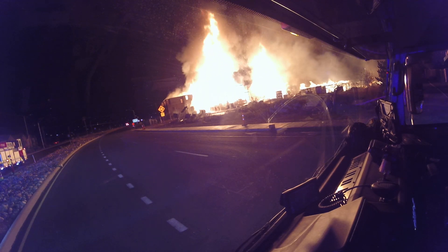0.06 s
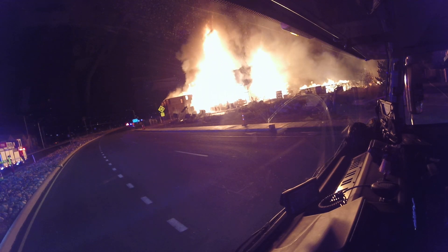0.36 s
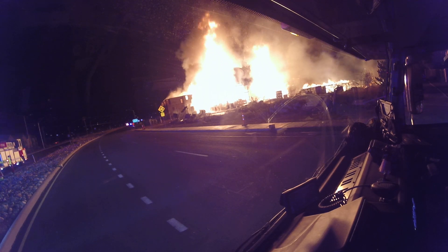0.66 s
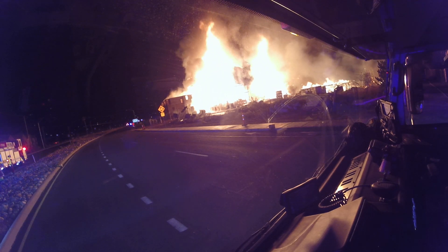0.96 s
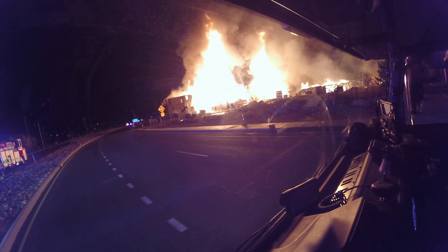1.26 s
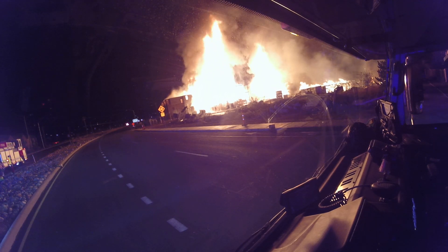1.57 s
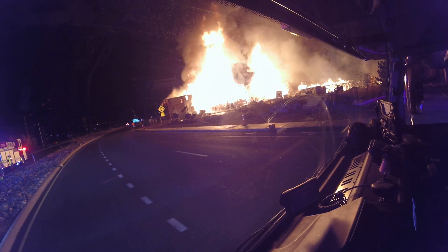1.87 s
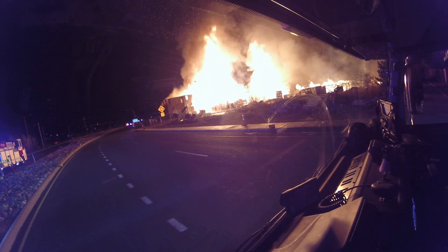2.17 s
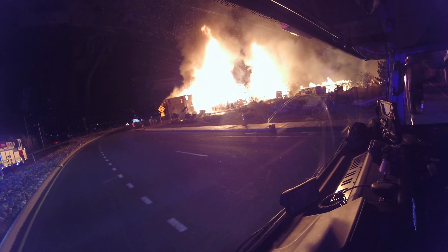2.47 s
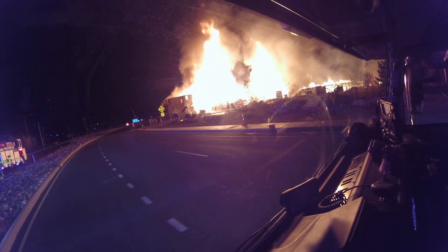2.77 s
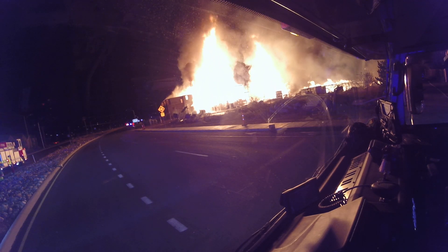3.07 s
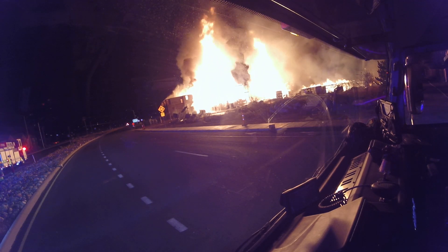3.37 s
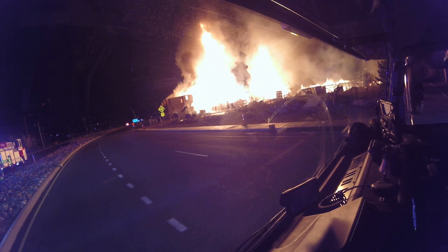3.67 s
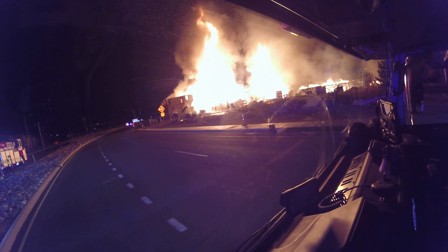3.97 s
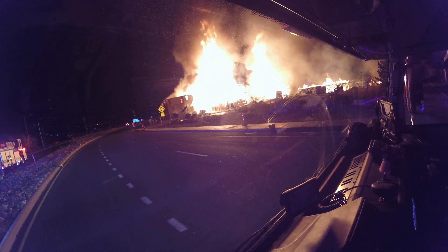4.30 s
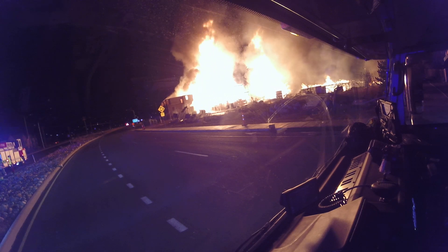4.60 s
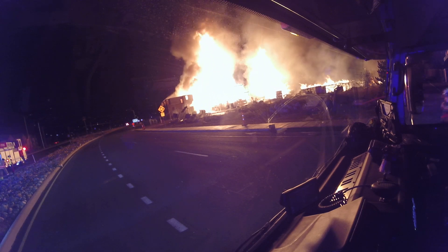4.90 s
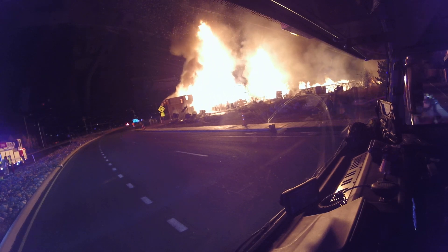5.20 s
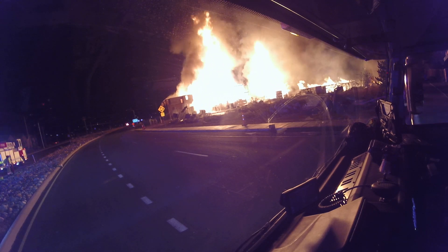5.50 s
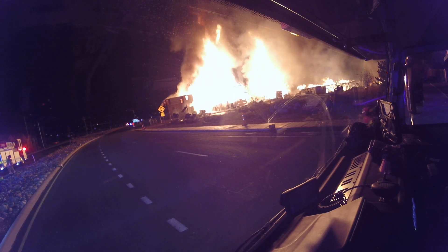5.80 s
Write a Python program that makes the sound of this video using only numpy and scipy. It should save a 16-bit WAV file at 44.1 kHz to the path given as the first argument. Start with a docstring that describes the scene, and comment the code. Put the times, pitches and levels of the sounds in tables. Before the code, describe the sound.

A large diesel engine runs for the whole six seconds, heard from inside the cab of a parked fire engine as it drives the water pump. Its deep, even boom dominates, over a muffled low rumble and a softer hum that pulses five to six times a second. Close to the microphone, a loose plastic fitting vibrates with the engine, making a continuous, quieter, buzzing rattle of tiny ticks and light knocks. From about 0.5 to 2 seconds the engine creeps slightly up in pitch, and the rattle turns a little lighter and duller, with a few tiny flares of chatter around 2 seconds. By about 3.3 seconds the engine has eased back and the rattle is crisper again, with a few slightly harder knocks until about 4.5 seconds. Drone and rattle then carry on steadily to the end.

```python
"""Fire engine cab, pump running

Inside the parked cab, a six-cylinder diesel booms as it drives the water pump, its firing rate creeping up and
down with the load. Its fourth harmonic beats with a nearby tone, likely the pump's vanes. Close to the
microphone the boom shakes a loose plastic housing, which chatters on one half of each swing and knocks on the
other, more lightly when the engine runs fast."""
import sys
import numpy as np
from scipy import signal
from scipy.fft import rfft, irfft, next_fast_len
from scipy.io import wavfile

SR = 44100
rng = np.random.default_rng(int(sys.argv[2]) if len(sys.argv) > 2 else 0)


def wav_out(sig):
    """Save sig, one row per channel (or a flat mono array), as 16-bit PCM at SR to the path in sys.argv[1]."""
    wavfile.write(sys.argv[1], SR, np.round(np.clip(np.atleast_2d(sig).T, -1, 1) * 32767).astype(np.int16))


N = 266805
TIME = np.arange(N) / SR
USUAL_RATE = 57     # firings per second; the housing swings once per firing


def from_db(db):
    """Decibels to gain."""
    return 10 ** (np.asarray(db) / 20)


def unit_rms(x):
    """Scale to an rms of 1."""
    return x / np.sqrt(np.mean(x ** 2) + 1e-20)


def curve(rows):
    """Join (seconds, value) rows into a value at every sample."""
    return np.interp(TIME, *np.transpose(rows))


def overspeed(rate):
    """Firings per second above the usual speed."""
    return np.maximum(rate - USUAL_RATE, 0)


def drift(hz):
    """A smooth random wander of rms 1 that changes about hz times a second."""
    hop, settle = 40, 2000
    pole = np.exp(-2 * np.pi * hz * hop / SR)
    noise = rng.standard_normal(N // hop + settle + 2)
    slow = signal.lfilter([1], [1, -2 * pole, pole * pole], noise)[settle:]
    return np.interp(np.arange(N) / hop, np.arange(len(slow)), unit_rms(slow))


def soften(x, corner_hz):
    """One-pole low-pass: a longer, softer contact."""
    pole = np.exp(-2 * np.pi * corner_hz / SR)
    return signal.lfilter([1 - pole], [1, -pole], x)


def lift_db(hz, modes):
    """How far a set of resonances raises each frequency."""
    return sum(lift / (1 + (2 * (hz - centre) / width) ** 2) for centre, width, lift in modes)


def resonate(x, spectrum, modes=()):
    """Pass x through a body with a broad spectrum and ringing resonances on top; rms 1."""
    size = 2 * next_fast_len(N // 2 + SR // 4)
    hz = np.maximum(np.arange(size // 2 + 1) * SR / size, 1)
    points_hz, points_db = np.transpose(spectrum)
    db = np.interp(np.log(hz), np.log(points_hz), points_db) + lift_db(hz, modes)
    # minimum phase, so the ringing follows each tap
    cepstrum = irfft(np.log(from_db(db)))
    cepstrum[1:size // 2] *= 2
    cepstrum[size // 2 + 1:] = 0
    return unit_rms(irfft(rfft(x, size) * np.exp(rfft(cepstrum)))[:N])


# The noise bed inside the cab. Each row: frequency in Hz, relative level in dB.
RUMBLE_SPECTRUM = [(20, -25.5), (45, -25), (62, -2.5), (80, -9), (98, 4.5), (117, -12), (137, -22),
                   (155, -6.5), (195, -13), (228, -6), (262, -12.5), (325, -11.5), (385, -24.5),
                   (470, -20.5), (620, -27.5), (1600, -25.5), (4000, -30.5), (12000, -84.5)]

def cab_rumble():
    """Combustion and fan noise reach the microphone through the cab walls."""
    return from_db(-36.5) * resonate(rng.standard_normal(N), RUMBLE_SPECTRUM)


# The cab's air around the microphone. Each row: resonance in Hz, width in Hz, lift in dB.
CAB_AIR_MODES = [(100, 6.5, 21), (235, 17, 8)]

def cab_tone(hz, phase, level_db):
    """A tone swells as it slides into an air resonance of the cab."""
    return np.sqrt(2) * from_db(level_db + lift_db(hz, CAB_AIR_MODES)) * np.cos(phase)


def hum(firings, rate, per_firing, level_db, delay_s, waver_db):
    """A slightly unsteady tone geared to the engine, delayed on its way into the cab."""
    hz = per_firing * rate
    phase = 2 * np.pi * (per_firing * firings - hz * delay_s) + .25 * drift(1.5)
    return cab_tone(hz, phase, level_db + waver_db * drift(1.5))


# The slow swell of both hums in the cab. Each row: time in seconds, gain in dB.
HUM_GAIN = [(0, 0.5), (2.2, -0.5), (2.9, 2.5), (3.6, -0.5), (5.3, -1.5), (6.05, 0)]

def beating_hums(firings, rate):
    """The engine's fourth harmonic and the pump's tone beat five to six times a second."""
    engine = hum(firings, rate, per_firing=4, level_db=-48.2, delay_s=.0007, waver_db=1.4)
    pump = hum(firings, rate, per_firing=4.0975, level_db=-48.7, delay_s=.0003, waver_db=1.2)
    return from_db(curve(HUM_GAIN)) * (engine + pump)


# The diesel's tones before the cab lifts them.
# Each row: multiple of the six-firing cycle, relative level in dB.
DIESEL_TONES = [(3, -43), (4, -39), (5, -32), (6, 1), (7, -23.5), (8, -39), (9, -25.5), (10, -31),
                (11, -33.5), (12, -37.5), (13, -46), (15, -43), (16, -43), (17, -44), (18, -45), (20, -48),
                (22, -50), (23, -49), (25, -48), (26, -48), (30, -52), (33, -54), (48, -55)]

def diesel_boom(firings, rate):
    """A steady firing tone; unequal cylinders add weaker, wavering tones at multiples of the cycle."""
    tones = np.zeros(N)
    for multiple, level_db in DIESEL_TONES:
        per_firing = multiple / 6
        away = abs(per_firing - 1)      # tones far from the firing rate lag and waver more
        phase = 2 * np.pi * (per_firing * firings - .55 * away ** 3) + .5 * away * drift(1.5)
        waver_db = 3 * min(away, 1) * drift(2.3)
        tones += cab_tone(per_firing * rate, phase, level_db + waver_db)
    return from_db(-9.5 - .35 * overspeed(rate)) * tones


# The cylinders as they shake the housing, in firing order. Each row: knock in dB, chatter in dB.
CYLINDER_SHAKE = [(-0.2, 4.7), (-0.8, 2.6), (-2.2, 3.5), (-3.2, 2.5), (-2.6, 3.7), (-0.7, 3.5)]

def cylinder_db(swing):
    """Unequal cylinders take turns: the relative knock and chatter strengths of each numbered swing."""
    return np.array(CYLINDER_SHAKE)[swing % len(CYLINDER_SHAKE)].T


def contact_times(firings, rate, place, slip, jitter, late_per_db=0):
    """One contact per swing, later at speed or after a weak cylinder; offsets are shares of a swing."""
    swing = np.arange(int(firings[-1]))
    excess = np.interp(swing, firings, rate) - USUAL_RATE
    knock_db, _ = cylinder_db(swing)
    late = slip * excess - late_per_db * knock_db
    return np.interp(swing + place + late + jitter * rng.standard_normal(len(swing)), firings, TIME)


def bounces(times, force_db, bounce_s=0, bounce_db=0, scatter=0, count=1):
    """Each contact makes count clicks, about bounce_s apart and changing by bounce_db; rms 1."""
    clicks = np.zeros(N)
    for k in range(count):
        samples = np.clip((times * SR).astype(int), 0, N - 1)
        np.add.at(clicks, samples, from_db(force_db + k * bounce_db))
        times = times + bounce_s * np.exp(scatter * rng.standard_normal(len(times)))
    return unit_rms(clicks)


def lift_off_ticks(firings, rate):
    """The housing leaves its seat with a light touch that is all treble."""
    times = contact_times(firings, rate, place=.7, slip=.025, jitter=.012)
    force_db = rng.normal(0, 3, len(times))
    ticks = bounces(times, force_db, bounce_s=.0004, bounce_db=2.5, scatter=.5, count=3)
    return unit_rms(ticks - soften(ticks, corner_hz=3850))


# Flares of chatter near the microphone. Each row: time in seconds, level in dB above a usual swing.
CHATTER_FLARES = [(1.896, 4.5), (2.015, 5), (2.186, 4), (2.203, 5)]

def chatter(firings, rate):
    """The housing skitters along its seat in tiny taps that build to the top of the swing and die away."""
    start, peak, fade = .755, .21, .24      # shares of a swing
    taps_per_s = 10000
    swings = firings - .029 * (rate - USUAL_RATE) - start       # later at speed
    swing = np.floor(swings).astype(int) + 1
    age = swings % 1
    build = from_db(-7.5 * np.maximum(1 - age / peak, 0))
    decay = np.exp(-(np.maximum(age - peak, 0) / fade) ** 2)
    swing_db = .9 * rng.standard_normal(swing.max() + 2)
    for time_s, flare_db in CHATTER_FLARES:
        swing_db[swing[round(time_s * SR)]] = flare_db
    _, chatter_db = cylinder_db(swing)
    force_db = chatter_db + swing_db[swing] + 2.5 * rng.standard_normal(N)
    impulses = (rng.random(N) < taps_per_s / SR) * rng.choice([-1, 1], N)
    taps = impulses * from_db(force_db) * build * decay
    return unit_rms(taps - .66 * soften(taps, corner_hz=1790))      # tiny taps carry little low end


# The hardest knocks at the microphone. Each row: time in seconds, level in dB against USUAL_KNOCK_DB.
KNOCK_ACCENTS = [(0.113, -12), (0.132, -15), (0.221, -14), (1.181, -17), (1.696, -17), (2.208, -18),
                 (3.35, -15), (3.456, -14), (3.65, -15), (3.737, -15), (4.159, -15), (4.494, -14)]
USUAL_KNOCK_DB = -16.3

def knock_force_db(firings, rate):
    """Each knock takes its cylinder's strength and some chance, lighter at speed; a few land hard."""
    swing = np.arange(int(firings[-1]))
    knock_db, _ = cylinder_db(swing)
    force_db = knock_db + 2.2 * np.tanh(rng.standard_normal(len(swing)))
    force_db -= 1.2 * overspeed(np.interp(swing, firings, rate))
    times, accent_db = np.transpose(KNOCK_ACCENTS)
    force_db[np.interp(times, TIME, firings).astype(int)] = accent_db - USUAL_KNOCK_DB
    return force_db


# The housing's stop, heard close up. Each row: frequency in Hz, relative level in dB.
STOP_SPECTRUM = [(150, -26.5), (450, -5), (800, -0.5), (1500, 4), (2300, 12.5), (6000, -28), (15000, -67.5)]

def stop_tocks(landings, force_db):
    """The stop answers each knock with a dull tock."""
    clicks = bounces(landings, force_db + rng.normal(0, 1.8, len(landings)))
    return resonate(clicks, STOP_SPECTRUM)


def cab_tail(contacts):
    """The cab carries every contact on in a short noisy tail that dies within a few milliseconds."""
    envelope = np.sqrt(np.abs(soften(contacts ** 2, corner_hz=80.5)))
    return soften(envelope * rng.standard_normal(N), corner_hz=4530)


# The plastic's broad response to a tap, close up. Each row: frequency in Hz, relative level in dB.
PLASTIC_SPECTRUM = [(150, -22), (450, -12), (900, -16), (1500, -4), (2300, 2), (3150, 0), (4200, -8),
                    (6500, -8), (7400, -15.5), (9300, -17), (9900, -26.5), (11300, -28.5), (12000, -33),
                    (15000, -34)]
# Its ringing. Each row: resonance in Hz, width in Hz, lift in dB.
PLASTIC_RESONANCES = [(2080, 120, 8.3), (2690, 410, 8.8), (3735, 70, 5.2), (5270, 530, 5.5),
                      (6160, 270, 3.5), (7950, 320, 6.8), (9330, 350, 6), (10460, 460, 8.5)]

def loose_housing(firings, rate):
    """On each swing the plastic rings as it lifts off, chatters, then knocks on its stop."""
    ticks = lift_off_ticks(firings, rate)
    taps = chatter(firings, rate)
    landings = contact_times(firings, rate, place=.325, slip=.045, jitter=.014, late_per_db=.02)
    force_db = knock_force_db(firings, rate)
    # the rebounds follow the main ring of the plastic and pump it up
    knocks = bounces(landings, force_db, bounce_s=.00036, bounce_db=-2.4, scatter=.22, count=5)
    tocks = stop_tocks(landings, force_db)
    contacts = knocks + from_db(.8) * taps + from_db(-14) * ticks
    contacts += from_db(-5) * cab_tail(contacts)
    # the lighter contacts at speed are duller too, and the treble flickers by chance
    treble_db = -1.1 * (rate - USUAL_RATE) + .9 * drift(14)
    dull = soften(contacts, corner_hz=3550)
    contacts = dull + from_db(treble_db) * (contacts - dull)
    ringing = resonate(contacts, PLASTIC_SPECTRUM, PLASTIC_RESONANCES)
    level_db = -30.3 - .92 * np.abs(rate - 56.5)        # loudest at 56.5 firings per second
    return from_db(level_db) * (ringing + from_db(-9.4) * tocks)


# The diesel's speed under the pump's load. Each row: time in seconds, firings per second.
FIRING_RATE = [(0.0, 55.4), (0.55, 55.8), (0.8, 56.44), (1.3, 58.14), (1.85, 58.57), (2.35, 58.51),
               (2.6, 57.93), (3.0, 57.48), (3.3, 56.91), (4.3, 56.85), (5.1, 56.76), (6.05, 56.79)]

def scene():
    """One microphone in the cab: boom, hums and rumble all around, the rattling housing close by."""
    rate = curve(FIRING_RATE)
    firings = np.cumsum(rate) / SR - .022       # running count of firings
    background = diesel_boom(firings, rate) + beating_hums(firings, rate) + cab_rumble()
    return (background + loose_housing(firings, rate))[None, :]


def record(dry):
    """A steep low-pass on the microphone signal, 70 dB down from 15.6 kHz."""
    return signal.sosfilt(signal.cheby2(12, 70, 15600, fs=SR, output="sos"), dry)


dry = scene()
out = record(dry)
wav_out(out)
```